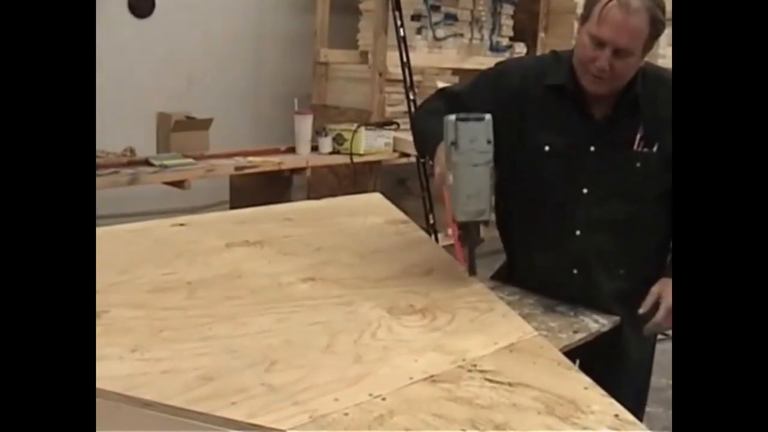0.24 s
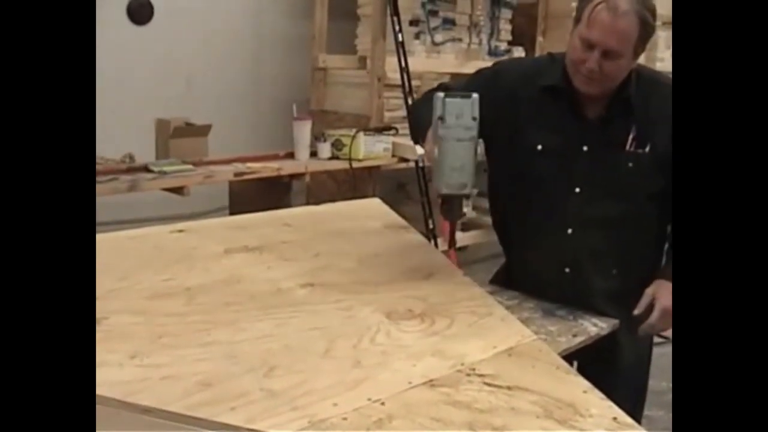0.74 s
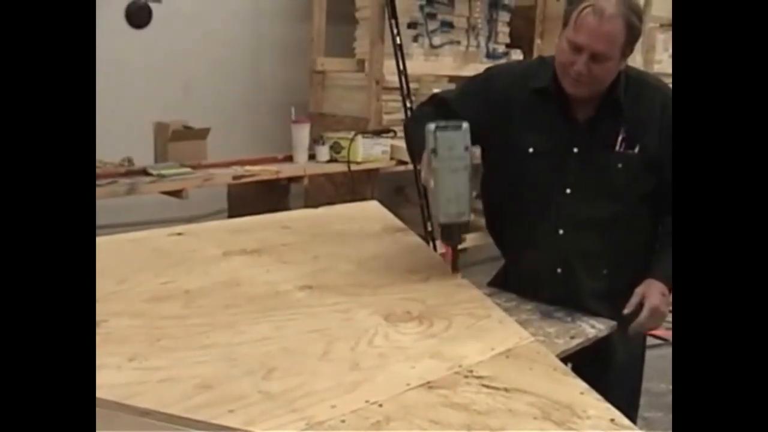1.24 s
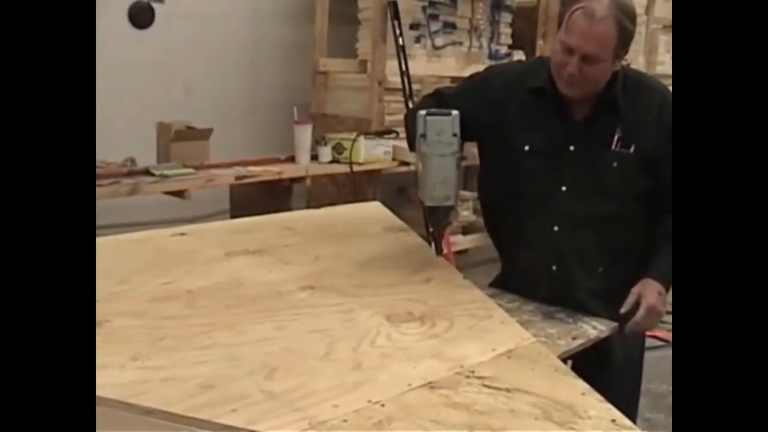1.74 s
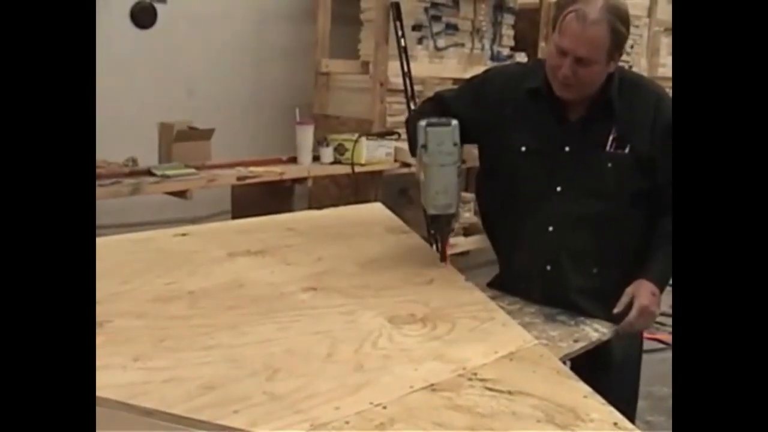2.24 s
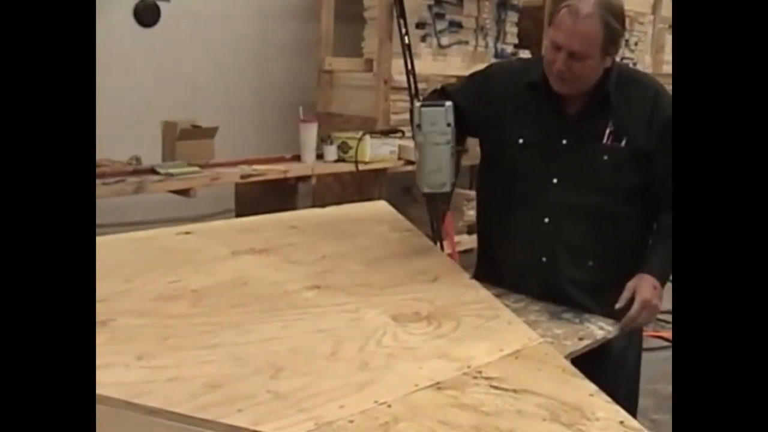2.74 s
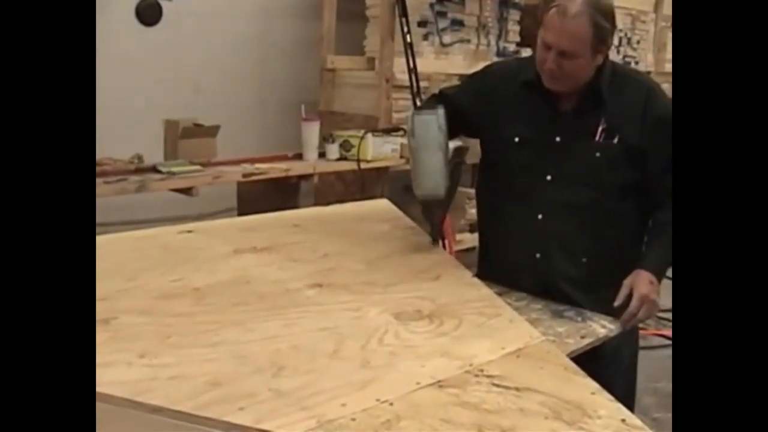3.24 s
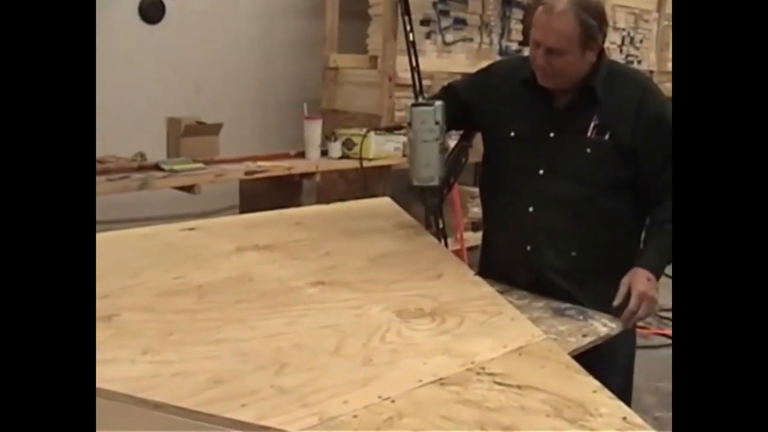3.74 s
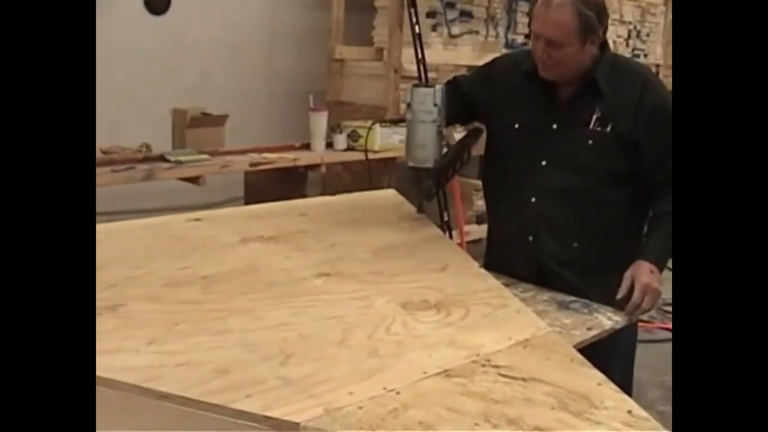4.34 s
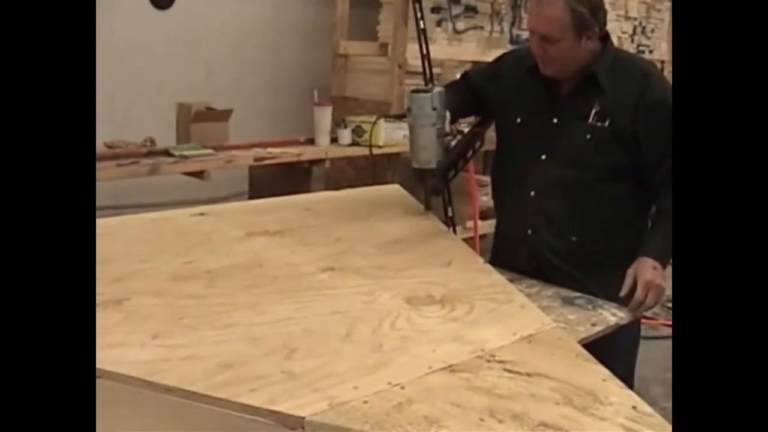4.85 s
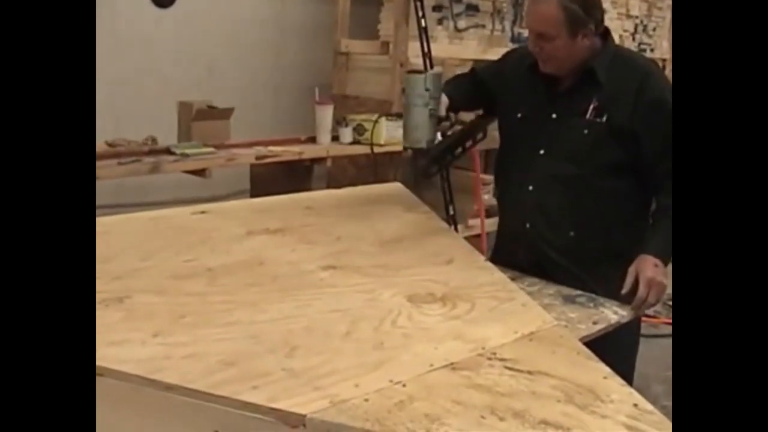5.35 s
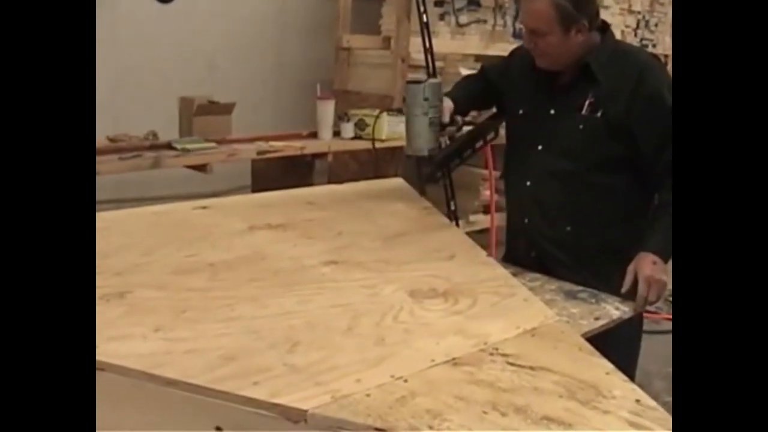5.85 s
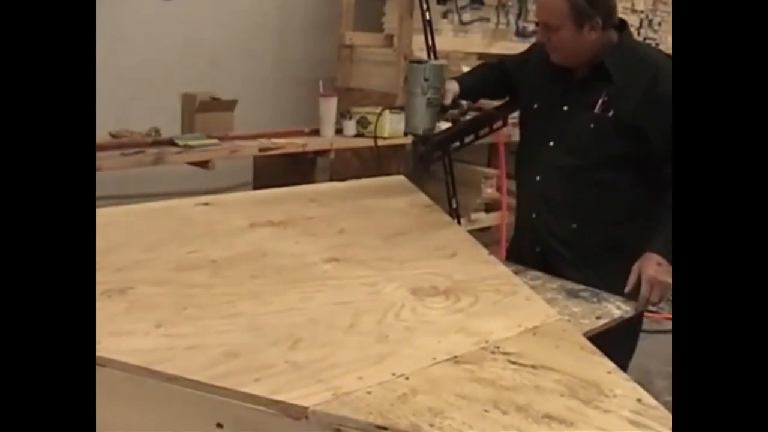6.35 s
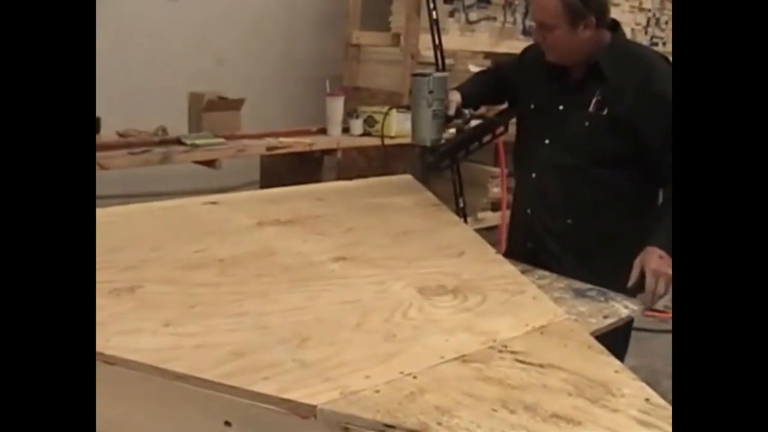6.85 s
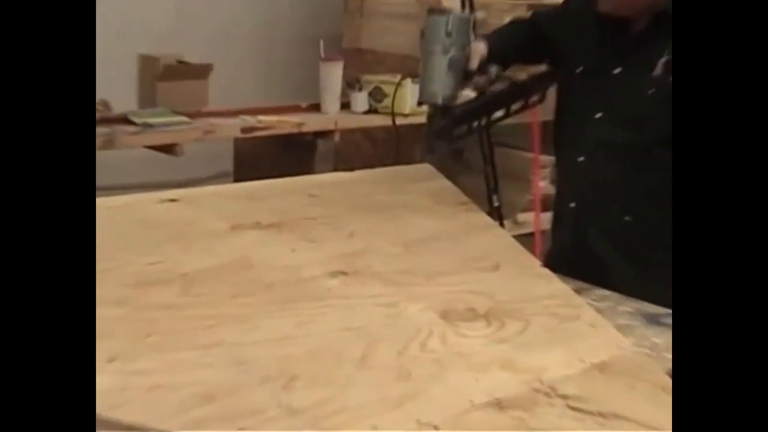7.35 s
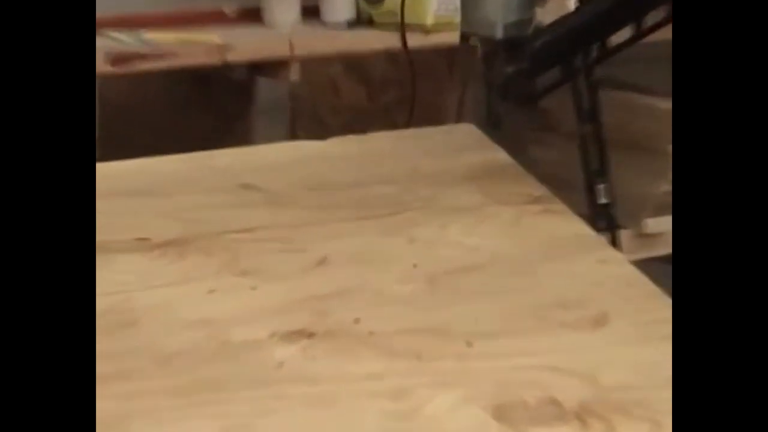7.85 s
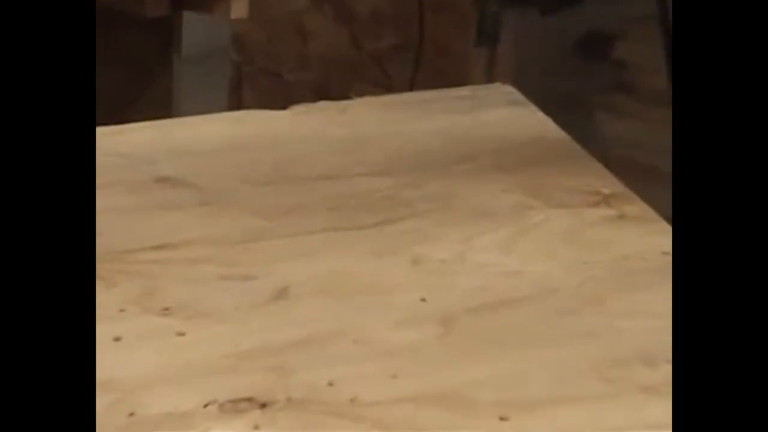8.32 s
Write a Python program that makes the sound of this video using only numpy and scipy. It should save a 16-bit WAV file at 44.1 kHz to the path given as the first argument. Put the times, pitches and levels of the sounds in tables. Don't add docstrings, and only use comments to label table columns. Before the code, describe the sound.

In a big reverberant workshop, single nailer shots land at a regular working pace. The nose bumps the board, then a hard crack bursts out with boomy wood, ringing steel and a sharp air exhaust. Echo fills most of each gap, over room noise, a thin high whine and a soft whistling leak. Early shots are strongest; later ones turn away, less airy and duller. A camera microphone squeezes the loud tails.

```python
import sys
import numpy as np
from scipy import signal
from scipy.fft import rfft, irfft
from scipy.io import wavfile
from scipy.ndimage import uniform_filter1d

SR = 44100
rng = np.random.default_rng(int(sys.argv[2]) if len(sys.argv) > 2 else 0)


def master(y):
    cut = np.clip(np.atleast_2d(y).T, -1, 1)
    pcm = np.round(cut * 32767)
    wavfile.write(sys.argv[1], SR, pcm.astype(np.int16))


def linear_from_db(decibels):
    return 10 ** (np.asarray(decibels, float) / 20)


N = 378378
LEAD = SR // 2

# (time [s], driver ring [Hz], ring level [dB], force [dB], sheet boom [dB])
BLOWS = [
    (-.42, 2000, -4, 2, 6),
    (0.5153, 1935, -8, -3.5, 8),
    (1.4804, 1800, -7.5, -3, 4.5),
    (2.4998, 1900, -4, -4.5, 2),
    (3.388, 1900, -2.5, -5, -1.5),
    (4.3587, 1950, -5.5, -6.5, 4.5),
    (5.241, 2120, -3, -6, 1),
    (6.149, 1894, -5, -5.5, 1),
    (7.309, 1950, -6.5, -8, 3.5),
    (8.2474, 1860, -9, -8.5, 4),
]


def evened(x):
    return x / np.sqrt(np.mean(x ** 2) + 1e-20)


def read(points, hz):
    f, value = np.transpose(points)
    return np.interp(np.log(hz + 1), np.log(f + 1), value)


def add(mix, s, sound):
    part = mix[..., LEAD + round(s * SR):][..., :sound.shape[-1]]
    part += sound[..., :part.shape[-1]]


def near(sound):
    return np.array([linear_from_db(-1.6) * sound, linear_from_db(-2.5) * np.append(0, sound[:-1])])


def coloured(colour, size):
    spectrum = rfft(rng.standard_normal(size))
    return evened(irfft(spectrum * linear_from_db(read(colour, np.fft.rfftfreq(size, 1 / SR))), size))


def ring(modes, rise):
    t = np.arange(SR // 8) / SR
    tones = 0
    for hz, db, t60 in modes:
        tones = tones + linear_from_db(db - 60 * t / t60) * np.sin(2 * np.pi * hz * rng.uniform(.98, 1.02) * t)
    return (1 - np.exp(-t / rise)) * tones


def crack(t60, lo_hz, hi_hz):
    burst = rng.standard_normal(SR // 8) * linear_from_db(-60 * np.arange(SR // 8) / SR / t60)
    band = signal.butter(2, [lo_hz, hi_hz], "bandpass", fs=SR, output="sos")
    return signal.sosfilt(band, burst)


def patches(shape, wide, long):
    across = uniform_filter1d(rng.standard_normal(shape), size=wide, axis=0)
    return evened(uniform_filter1d(across, size=long, axis=1))


def room_floor(t):
    # (frequency [Hz], level [dB])
    floor_colour = [(25, 16), (100, 7), (300, 12), (1000, 14.5), (2800, 3), (5800, -5), (6800, -2),
                    (7900, -5), (9500, -7), (13000, -11), (13600, -20), (14200, -55)]
    floor_db = -53
    mid, side = coloured(floor_colour, len(t)), coloured(floor_colour, len(t))
    return linear_from_db(floor_db) * np.array([mid + 0.36 * side, mid - 0.62 * side])


def drum_whine(t):
    # (frequency [Hz], level [dB])
    orders = [(2697, -68), (2998, -69), (3596, -72), (4495, -71), (5857, -67), (7494, -76), (7569, -72),
              (7790, -62), (8091, -66), (8393, -76), (8543, -78)]
    whine = 0
    for hz, db in orders:
        waver = 1 + .6 * np.sin(rng.uniform(3, 12) * t)
        whine = whine + linear_from_db(db - 8) * waver * np.sin(2 * np.pi * (hz * t + rng.random()))
    return whine


def leak(t):
    # (time [s], frequency [Hz])
    whistle_pitch = [
        (0, 6420),
        (1.9, 6330),
        (2.2, 6580),
        (3.3, 6120),
        (5.102, 5840),
        (8.58, 5960),
    ]
    # (frequency [Hz], level [dB])
    hiss_colour = [(1500, -31), (2500, 2.5), (4000, -5.5), (5500, -5), (7500, -5), (9000, -13.5),
                   (11500, -10.5), (13500, -13), (14300, -18), (14700, -50)]
    leak_db, fade_db_per_s = -50.5, -2.5
    refill_db_per_s = 3
    s, hz = np.transpose(whistle_pitch)
    shot_s = np.array([row[0] for row in BLOWS])
    since_s = t - shot_s[np.maximum(np.searchsorted(shot_s, t) - 1, 0)]
    fuzz = uniform_filter1d(uniform_filter1d(rng.standard_normal((2, len(t))), size=50), size=50)
    carrier = np.exp(2j * np.pi * np.cumsum(np.interp(t, s, hz)) / SR)
    whistle = evened(((fuzz[0] + 1j * fuzz[1]) * carrier).real)
    hiss = np.array([coloured(hiss_colour, len(t)) for ear in "lr"])
    air = linear_from_db(-4.5) * whistle + linear_from_db(1) * (hiss + 0.5 * hiss[::-1])
    return air * linear_from_db(leak_db + fade_db_per_s * t + refill_db_per_s * since_s)


def background():
    t = np.arange(N + LEAD) / SR - LEAD / SR
    return leak(t) + room_floor(t) + drum_whine(t)


def hall(colour, size, rise, boom_db=0, bright_db=0, ring_hz=2000, linger_db=0):
    # (frequency [Hz], t60 [s])
    t60_s = [(40, 0.42), (120, 0.79), (300, 1.617), (700, 1.676), (1500, 1.472), (2100, 1.25), (2700, 1.01),
             (4000, 0.93), (6000, 0.65), (10000, 0.43), (14000, 0.38), (16000, 0.17)]
    # (frequency [Hz], side minus mid [dB])
    width = [(30, -3), (70, -3), (130, -12.5), (290, -15.5), (640, -9), (1400, -5.5), (3100, -6),
             (5000, -7.5), (8000, -5.5), (15000, -2)]
    # (frequency [Hz], width [Hz], boost [dB])
    sheet = [(127.6, 27, 7), (212, 14.6, 8.5), (380, 31, 6), (450, 54, 4.5), (767.4, 74, 7),
             (1150, 103, 2.5), (1360, 250, 2.5)]
    hz = np.fft.rfftfreq(512, 1 / SR)[:, None]
    t = np.arange(size // 128 + 4) * 128 / SR
    a, b = rng.standard_normal((2, 2, len(hz), len(t)))

    boom = boom_db / (1 + (hz / 220) ** 4)
    bright = bright_db / (1 + (3000 / (hz + 1)) ** 4)
    linger = linger_db / (1 + ((hz - 1.02 * ring_hz) / 450) ** 2)
    level_db = read(colour, hz) + boom + bright + linger
    streaks_db = 2.0 * patches(a[0].shape, wide=2, long=400)
    clumps_db = 1.7 * patches(a[0].shape, wide=12, long=6)

    build = 1 - np.exp(-t / (rise + 0.44 / (hz + 30)))
    far_end = linear_from_db(-17.0 - 60 * t / 1.26) / (1 + (hz / 14300) ** 40)
    decay = linear_from_db(-60 * t / read(t60_s, hz)) + far_end
    z = (a + 1j * b) * build * linear_from_db(level_db + streaks_db + clumps_db) * decay
    z[1] *= linear_from_db(read(width, hz))
    mid, side = signal.istft(z, nperseg=512, noverlap=384)[1][:, :size]
    pair = np.array([mid + side, mid - side]) * np.minimum(np.arange(size) / 200, 1)

    fine_hz = np.fft.rfftfreq(size, 1 / SR)
    boost_db = 0
    for f, w, db in sheet:
        boost_db = boost_db + db * rng.uniform(0.54, 1.31) / (1 + (2 * (fine_hz - f) / w) ** 2)
    fade = np.cos(np.arange(size) / size * np.pi / 2) ** .5
    return irfft(rfft(pair) * linear_from_db(boost_db), size) * fade / 20


def puff(rise, t60, spread):
    # (frequency [Hz], width [Hz], level [dB])
    exhaust = [(3900, 900, -8), (6200, 900, 0), (7900, 1100, 0), (11500, 1300, -8), (14800, 2500, -15)]
    size = SR // 4
    t, hz = np.arange(size) / SR, np.fft.rfftfreq(size, 1 / SR)
    ports = 0
    for f, w, db in exhaust:
        port_hz = f * rng.uniform(0.84, 1.08)
        ports = ports + linear_from_db(db) / (1 + (2 * (hz - port_hz) / (w * spread)) ** 2)
    air = evened(irfft(rfft(rng.standard_normal(size)) * ports, size))
    flutter = linear_from_db(2.5 * evened(uniform_filter1d(rng.standard_normal(size), size=150)))
    return air * flutter * (1 - np.exp(-t / rise)) * linear_from_db(-60 * t / t60)


def bump(out, s, db, knock_hz, air_db):
    # (frequency [Hz], level [dB])
    knock_colour = [(25, -42), (150, -6), (400, -1.5), (1000, -11), (2200, -11.5), (3500, -13.5),
                    (6000, -7), (10000, -21.5), (16000, -19)]
    wood = ring([(knock_hz, 0, .15), (1.5 * knock_hz, -5, .08), (.8 * knock_hz, -3, .12)], rise=0.006)
    arm = ring([(1950, -5.0, 0.071), (5680, -3.0, 0.043), (8700, -9, 0.039), (11600, -15, .05)], rise=0.0017)
    add(out, s, near(linear_from_db(db - 5.5) * wood))
    add(out, s + 0.00192, near(linear_from_db(db - 3.5) * crack(0.09, .7 * knock_hz, 2200)))
    add(out, s + .003, linear_from_db(db + 8.5) * hall(knock_colour, SR // 2, 0.034))
    add(out, s + .012, near(linear_from_db(air_db - 4.5) * arm))
    add(out, s + 0.0036, near(linear_from_db(air_db) * puff(0.052, 0.24, spread=1.6)))


def snap(out, s, db):
    # (frequency [Hz], level [dB], t60 [s])
    steel = [(5300, -1, .012), (7000, -1, .011), (3700, -5, .008), (1900, -5, .008), (10800, -9, .006)]
    add(out, s, near(linear_from_db(db - 6) * ring(steel, rise=.0001)))
    add(out, s, near(linear_from_db(db + 2) * crack(.010, 900, 10000)))


def vent(out, s, db):
    gust_lag_s, gust_db = .018, -4.5
    add(out, s, near(linear_from_db(db) * puff(.001, .13, spread=.8)))
    add(out, s + gust_lag_s, near(linear_from_db(db + gust_db) * puff(0.0017, 0.085, spread=1.0)))


def blow(out, s, ring_hz, ring_db, force_db, boom_db):
    # (frequency [Hz], level [dB])
    slam_colour = [(25, -56), (60, -29), (90, -32), (120, -3.5), (250, 1), (500, 0.5), (1000, 1),
                   (2100, -3.5), (2600, -4.5), (5000, -4), (7500, -5.5), (10000, -11.5), (13000, -13),
                   (16000, -11)]
    driver = ring([(ring_hz, 0, .08), (1.3 * ring_hz, -5, .05), (0.6 * ring_hz, -5, .05)], rise=.0004)
    add(out, s, near(linear_from_db(ring_db) * driver))
    add(out, s, near(linear_from_db(force_db + 10.5) * crack(.055, 480, 2600)))
    add(out, s, near(linear_from_db(force_db - 6) * crack(0.042, 2700, 8900)))
    add(out, s, near(linear_from_db(force_db + boom_db - 6.5) * crack(0.085, 25, 180)))

    bright_db = -4 - 0.51 * ring_db
    linger_db = 6.5 + 0.66 * ring_db
    roar = hall(slam_colour, 7 * SR // 4, 0.0035, boom_db, bright_db, ring_hz, linger_db)
    add(out, s, linear_from_db(force_db + 7.0) * roar)
    add(out, s + 0.047, near(linear_from_db(force_db - 4) * crack(0.013, 570, 4200)))


def shots():
    # (time [s], knock level [dB], knock pitch [Hz], trigger air [dB])
    bumps = [
        (.481, -6.5, 499, -5.5),
        (1.4442, -2, 900, -35),
        (2.463, -12, 450, -9),
        (3.351, -8, 575, -11),
        (4.3212, -9.5, 398, -15),
        (5.201, -10, 600, -38.5),
        (6.113, -15.5, 484, -15),
        (7.269, -15.5, 790, -15),
        (8.211, -11, 830, -17),
    ]
    snap_lead_s, snap_db, snap_fade_db_per_s = .0078, 0, -.5
    vent_lag_s, vent_db, vent_fade_db_per_s = .016, 5.5, -1.67
    out = np.zeros((2, N + LEAD))
    for row in bumps:
        bump(out, *row)
    for s, *rest in BLOWS:
        snap(out, s - snap_lead_s, snap_db + snap_fade_db_per_s * s)
        blow(out, s, *rest)
        vent(out, s + vent_lag_s, vent_db + vent_fade_db_per_s * s)
    return out


def scene():
    return (shots() + background())[:, LEAD:]


def limiter(dry):
    close_s, recovery_db_per_s, threshold_db = 0.0029, 300.0, -16
    grip = 1 / (close_s * SR)
    power = signal.lfilter([grip], [1, grip - 1], (dry ** 2).mean(0))
    power_db = 10 * np.log10(power + 1e-12)
    fall_db = np.arange(N) * recovery_db_per_s / SR
    held_db = np.maximum.accumulate(power_db + fall_db) - fall_db
    over_db = np.maximum(held_db - threshold_db, 0)
    return dry / linear_from_db(0.68 * signal.lfilter([grip], [1, grip - 1], over_db))


def roll_off(x):
    return signal.sosfilt(signal.butter(12, 15950, fs=SR, output="sos"), x)


def record(dry):
    soft = 0.93 * np.tanh(limiter(dry) / 0.75)
    low_pass = signal.firwin(511, 15950, window=("kaiser", 9), fs=SR)
    banded = signal.oaconvolve(soft, low_pass[None], "same")
    return roll_off(banded)


dry = scene()
out = record(dry)
master(out)
```